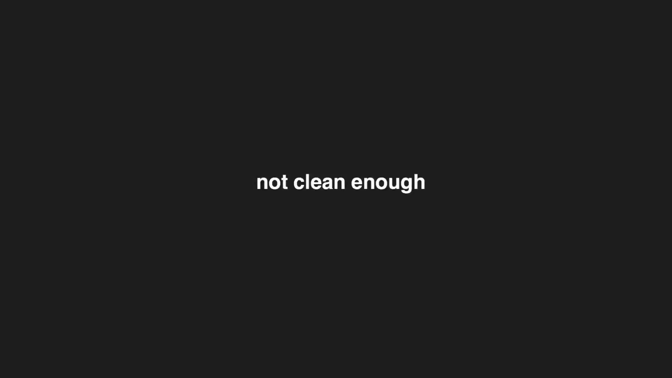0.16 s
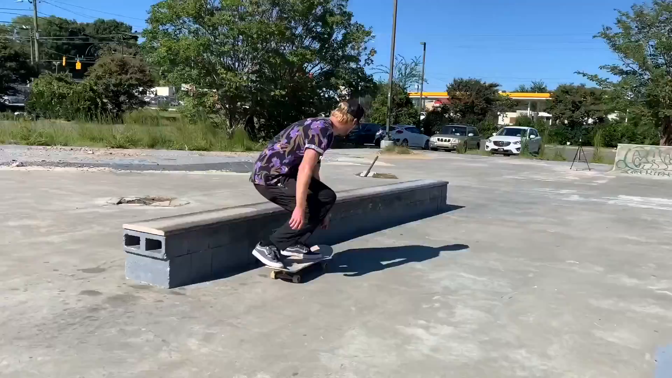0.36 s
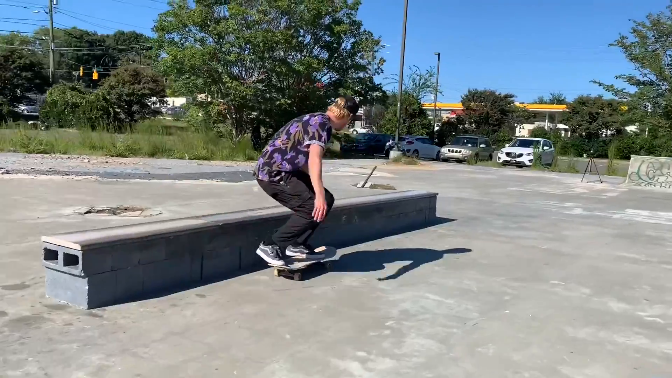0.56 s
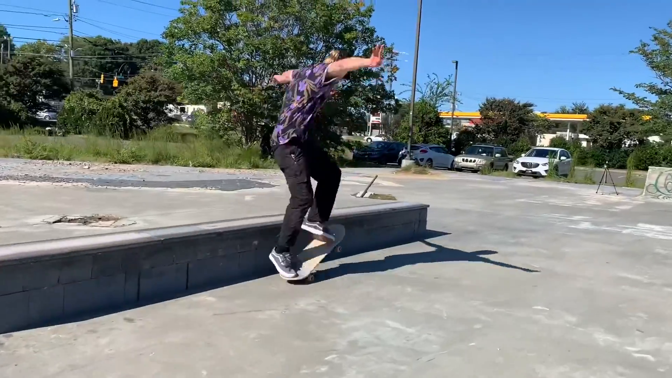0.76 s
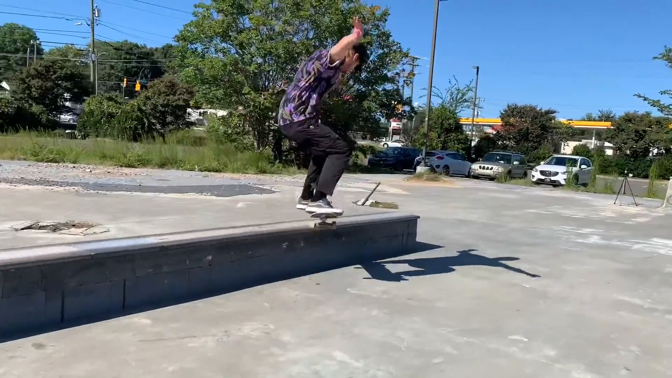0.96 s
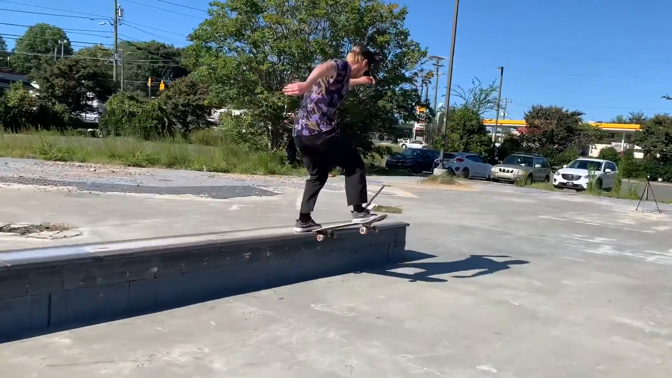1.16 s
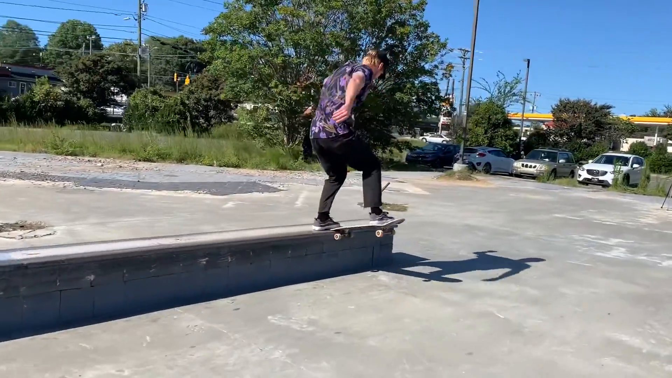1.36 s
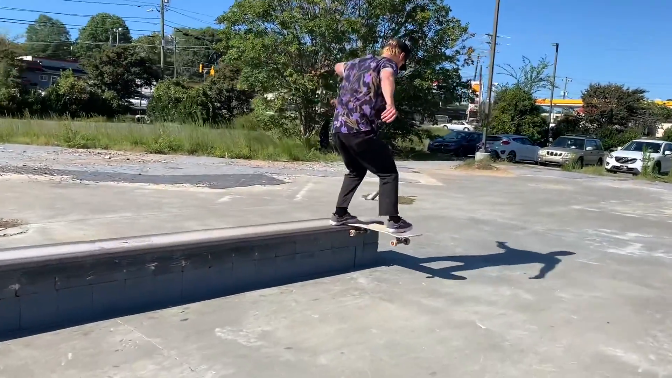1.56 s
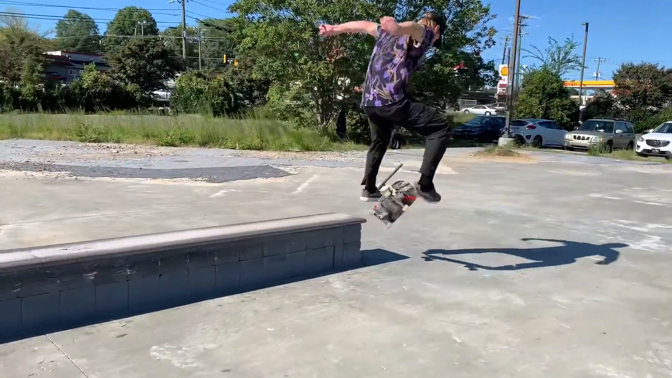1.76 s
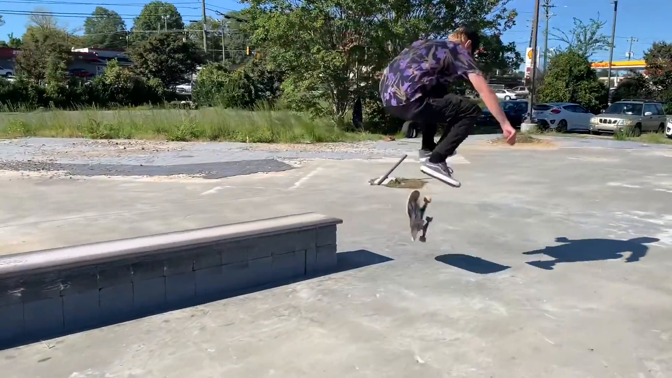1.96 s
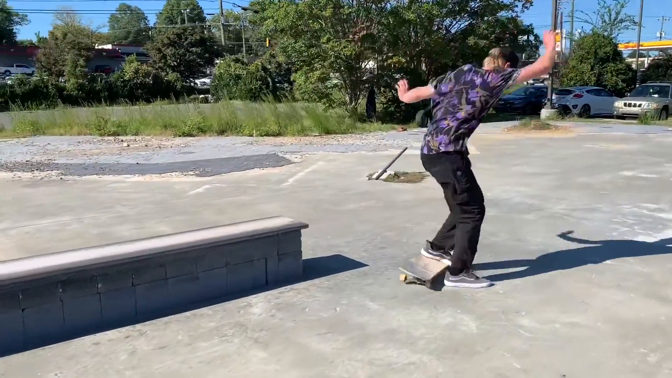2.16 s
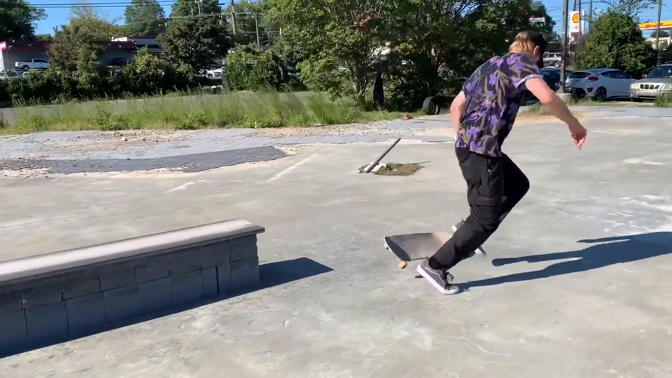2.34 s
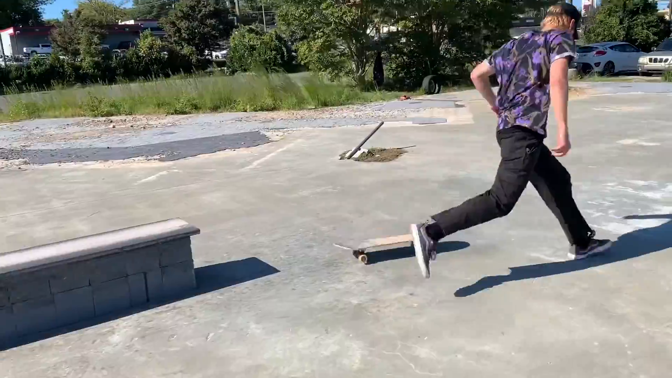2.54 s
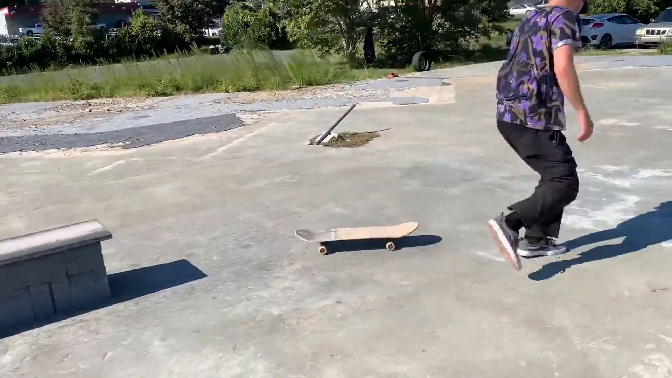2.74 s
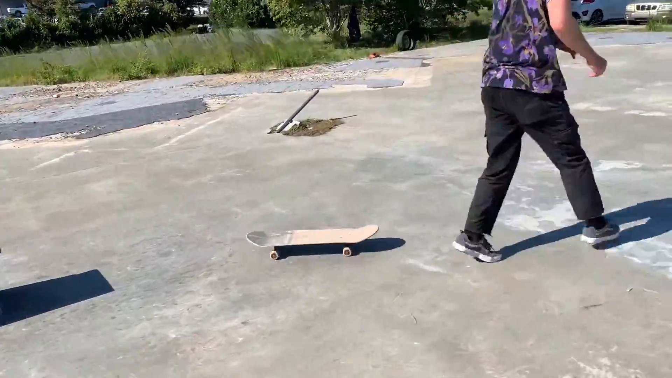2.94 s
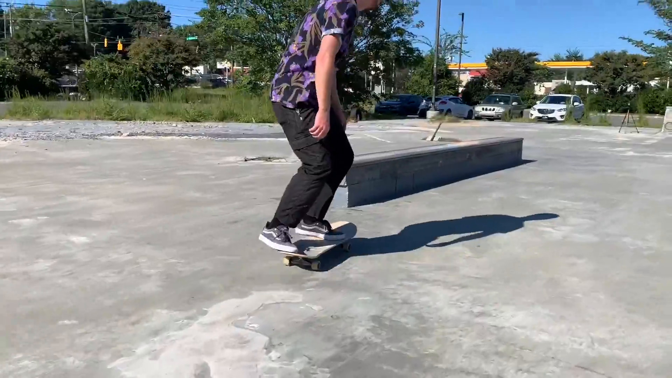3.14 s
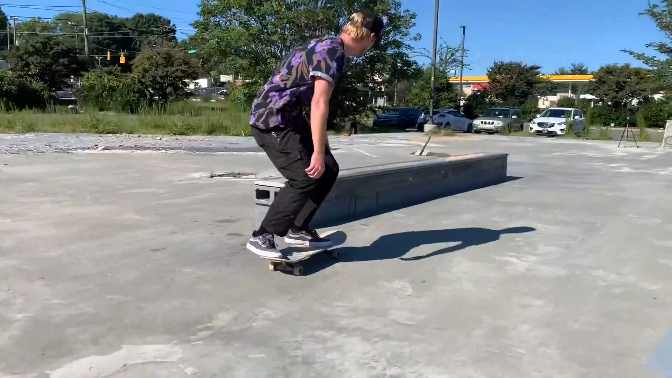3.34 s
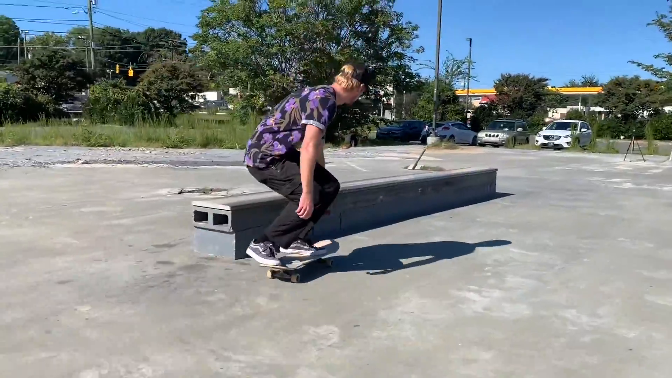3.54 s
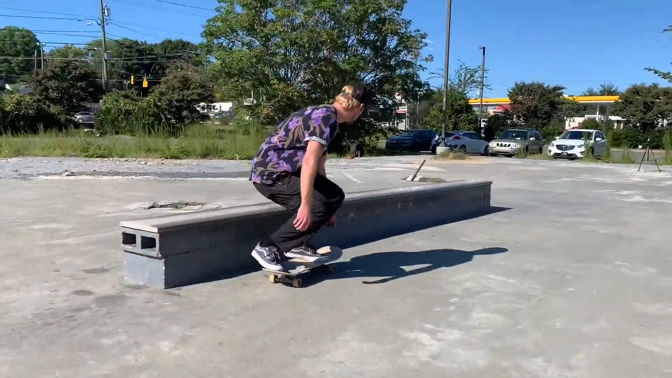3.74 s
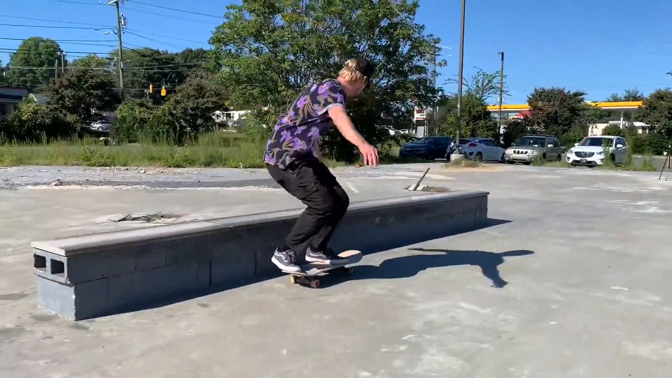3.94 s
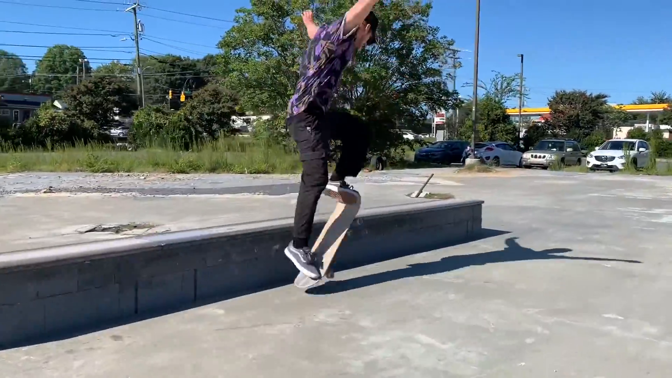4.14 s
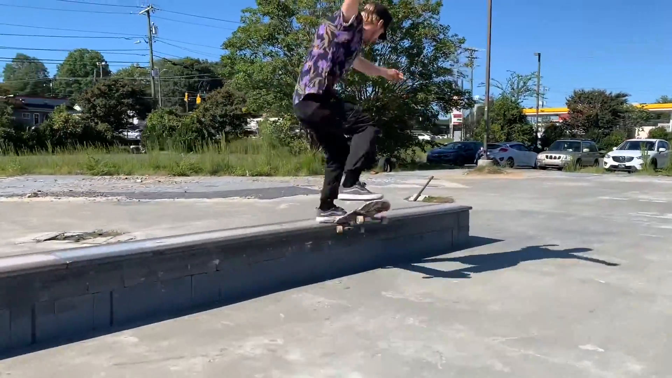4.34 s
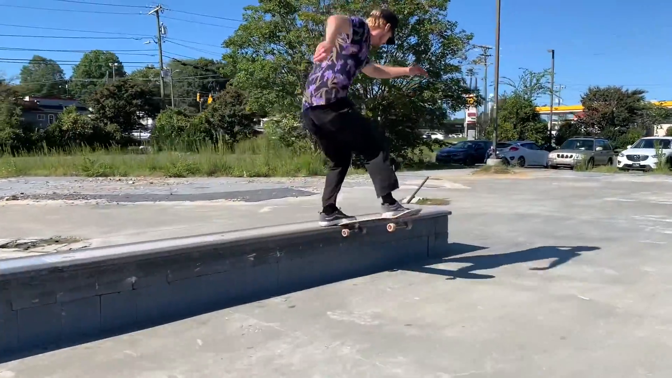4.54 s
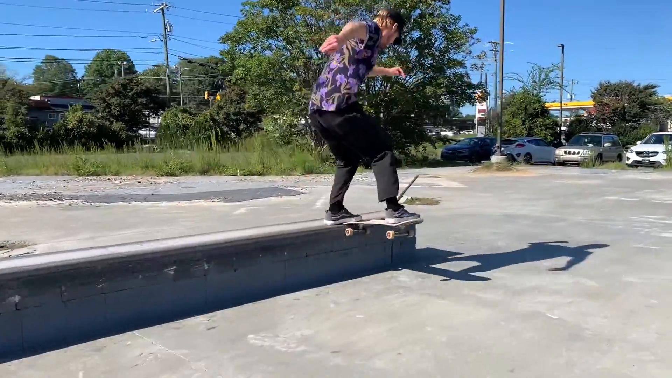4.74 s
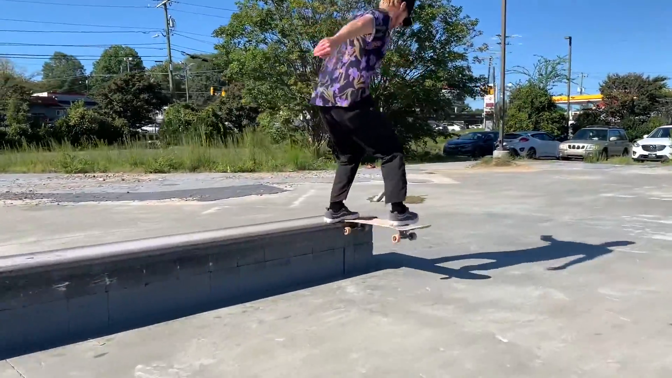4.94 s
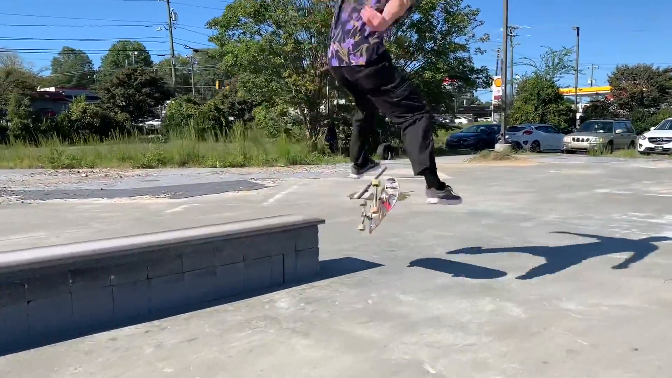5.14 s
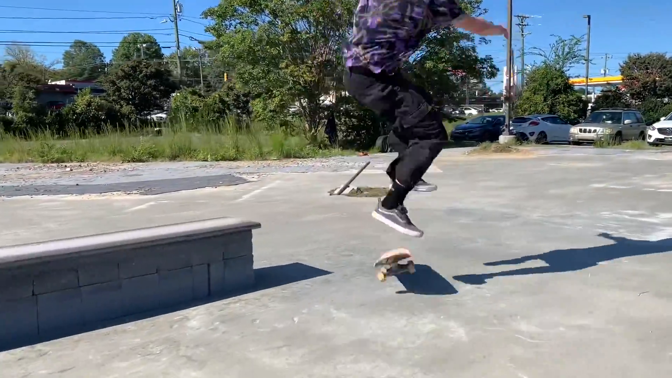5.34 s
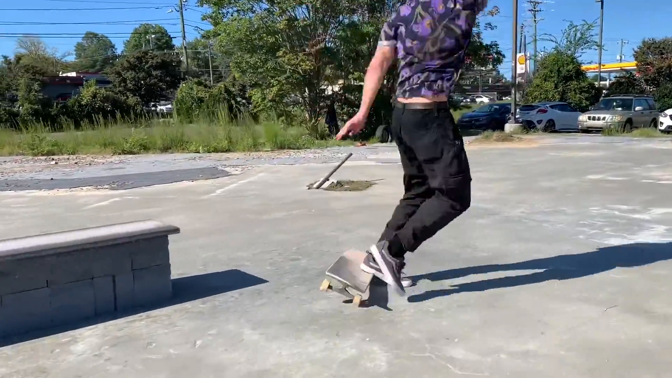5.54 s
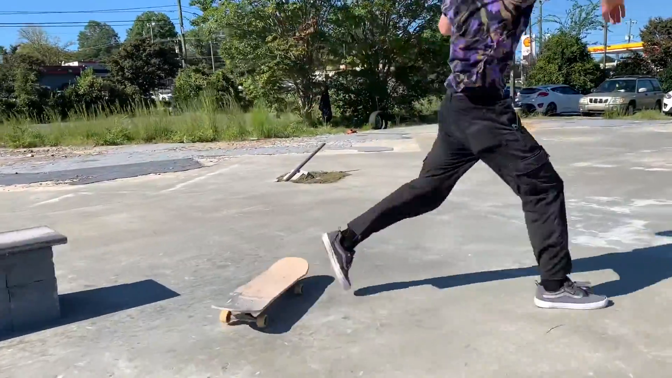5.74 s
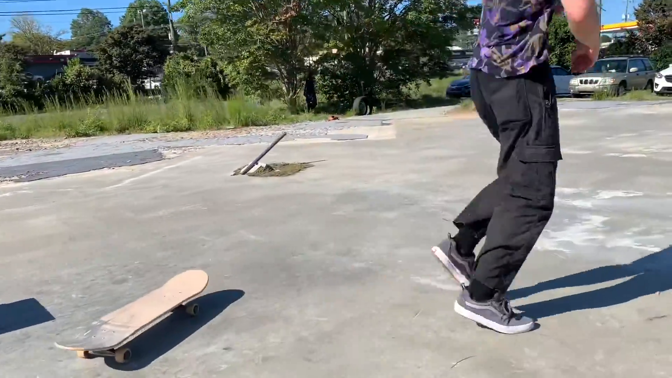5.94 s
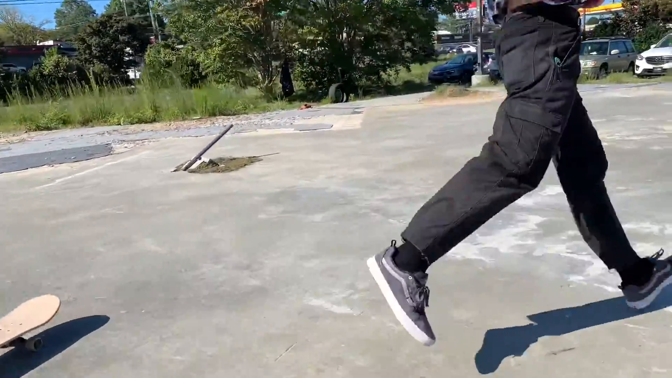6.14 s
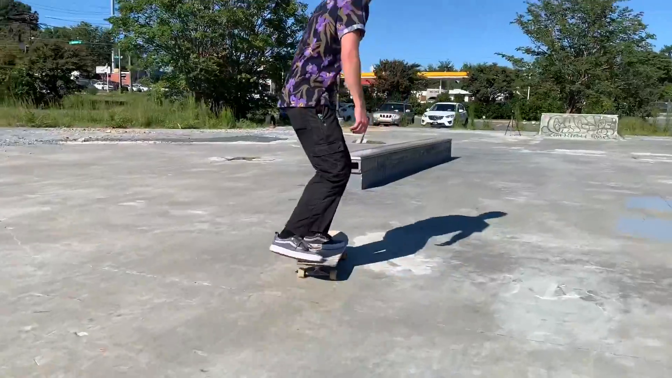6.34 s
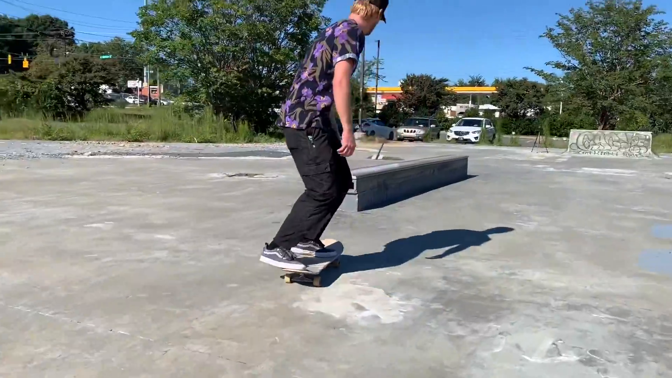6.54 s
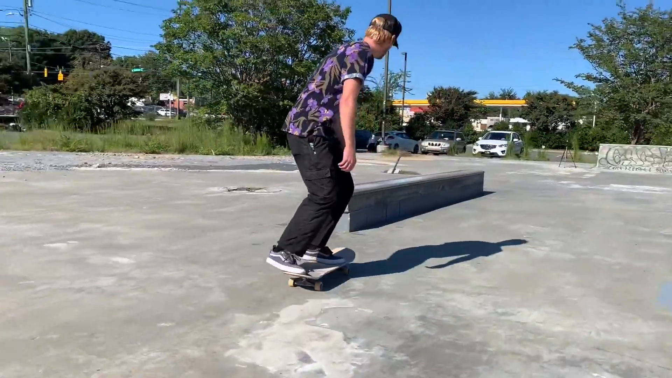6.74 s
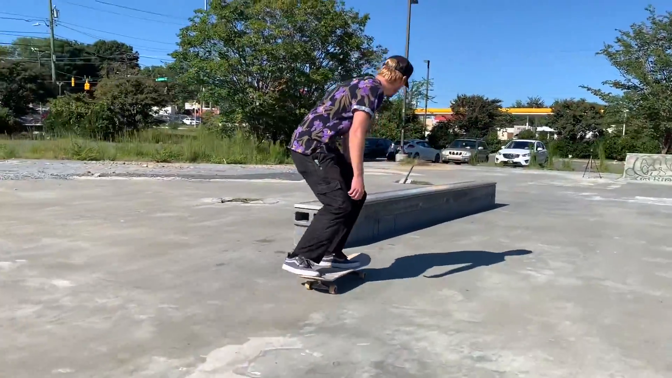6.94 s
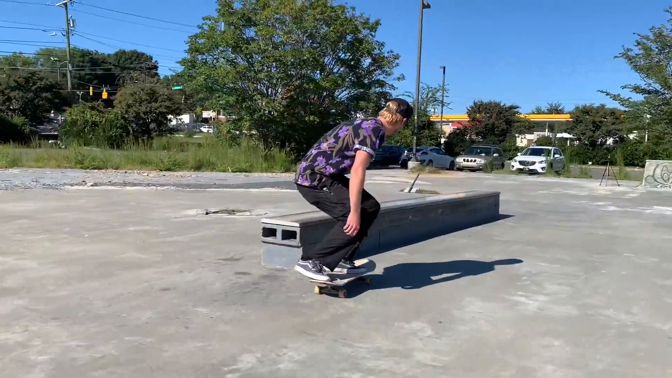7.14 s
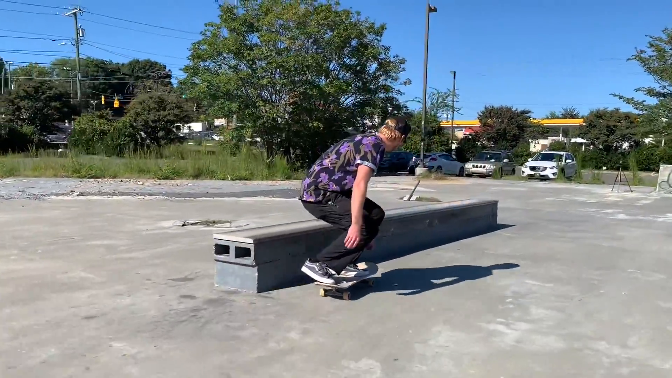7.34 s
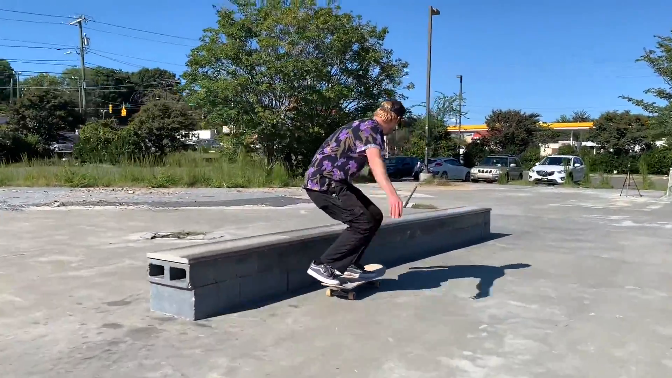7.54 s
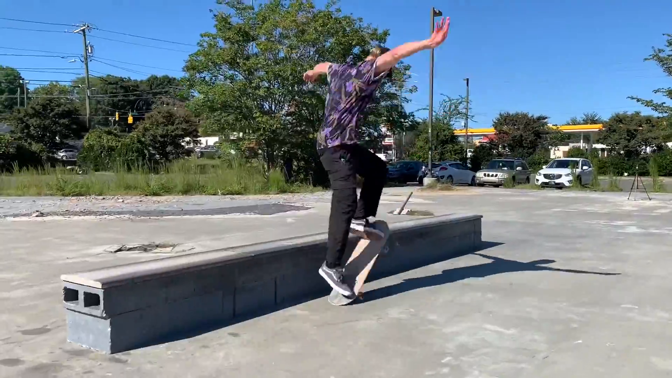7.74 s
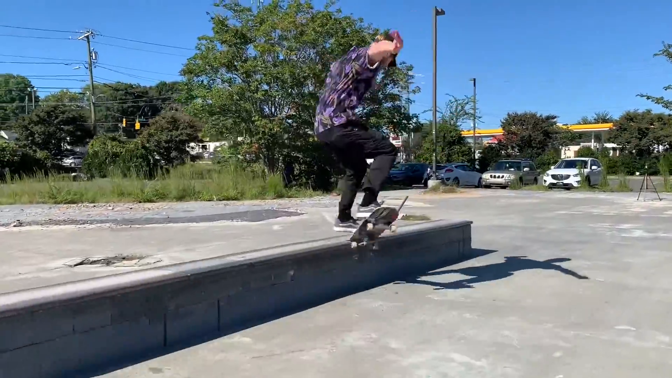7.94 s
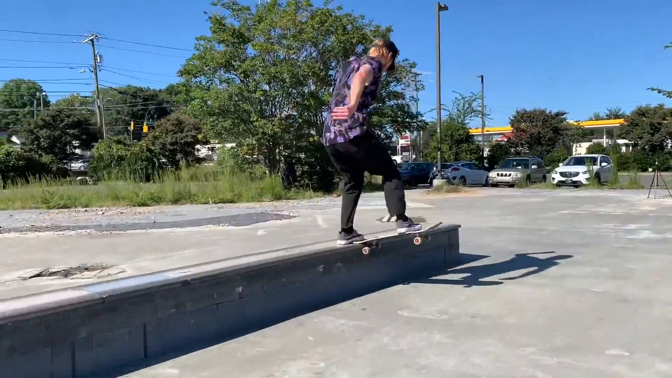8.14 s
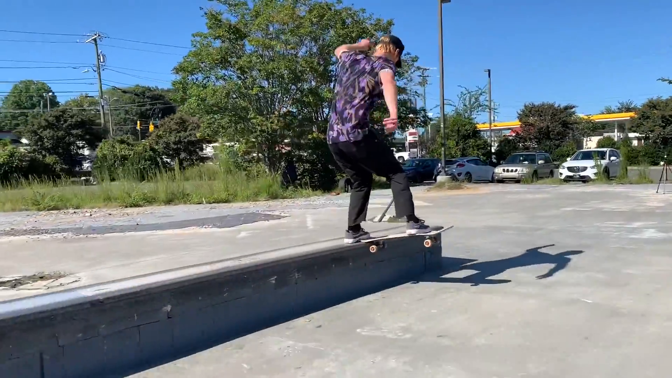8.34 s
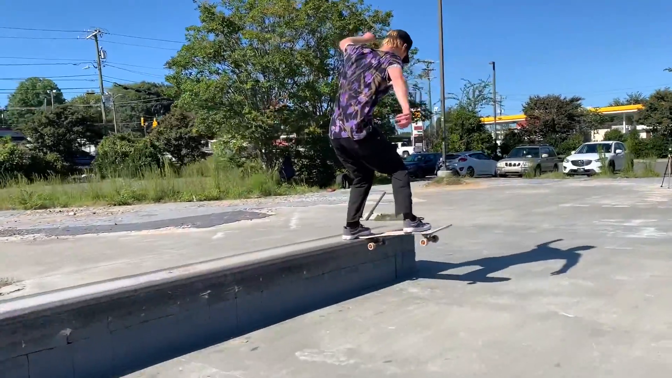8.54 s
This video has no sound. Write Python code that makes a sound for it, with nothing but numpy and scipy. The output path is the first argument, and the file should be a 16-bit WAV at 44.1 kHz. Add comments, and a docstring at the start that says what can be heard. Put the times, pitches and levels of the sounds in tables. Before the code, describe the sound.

Three abruptly joined skateboard attempts outdoors: gritty rolling, a hard pop and landing on a ledge, squeaky sliding, then clattering board knocks.

```python
"""A skateboard clacks and knocks on concrete and a steel ledge edge, in three tries played one after another.
Blows are noise bursts ringing steel and deck; knocks are short sagging deck notes; squeaks are wavering tones.
Scrapes are coloured grains, and narrow noise swells briefly into some blows. Under them wheels roll over
rough concrete, made of random bumps; this drops away after some blows and fades at the cuts between tries."""
import sys
import numpy as np
from scipy import signal
from scipy.fft import rfft, irfft
from scipy.io import wavfile
from scipy.ndimage import uniform_filter1d

SR = 44100
rng = np.random.default_rng(int(sys.argv[2]) if len(sys.argv) > 2 else 0)


def dump_mix(stems):
    """Bounce the given channels to the path in sys.argv[1] as a 16-bit WAV at rate SR."""
    frames = np.atleast_2d(stems).T  # one column per channel
    limited = np.clip(frames, -1, 1)  # hard clip at full scale
    pcm = np.round(limited * 32767).astype(np.int16)
    wavfile.write(sys.argv[1], SR, pcm)


N = 378819

# notes of the wooden deck: f/Hz, width/Hz, level/dB
DECK_RINGS = [(394, 152.5, -4), (484, 96.4, 2.5), (536.8, 64, 1), (636.5, 53.5, -2.5), (790.6, 52, -7.5),
              (1140, 153, -16)]
# rings of the axles and the ledge edge: f/Hz, width/Hz, level/dB
STEEL_RINGS = [(1070, 200, 3.5), (1376, 53, 7.5), (1813, 300, 3.5), (2354, 206, 4), (2824, 210, 1),
               (3375, 260, 1), (3890, 350, -2), (4786, 210, 2.5)]
# joins between the tries: t/s, rolling fades out over/s, fades back in over/s
TRY_CUTS = [(2.995, 1, 0.039), (6.195, 0.041, 0.033)]


def undb(db):
    """Turn dB into a gain."""
    return 10 ** (np.asarray(db) / 20)


def unit(x):
    """Scale to an rms of 1."""
    return x / np.sqrt(np.mean(x ** 2))


def along_hz(points, size):
    """Read a (f/Hz, value) table at every bin of a transform, evenly in log frequency."""
    hz, value = np.transpose(points)
    return np.interp(np.log(np.fft.rfftfreq(size, 1 / SR) + 1), np.log(hz + 1), value)


def colour(x, points):
    """Filter by a (f/Hz, level/dB) table."""
    size = x.shape[-1]
    return irfft(rfft(x) * undb(along_hz(points, size)), size)


def ring(x, hz, width_hz):
    """Make one resonance ring, with a gain of 1 at its centre."""
    b, a = signal.iirpeak(min(hz, .45 * SR), hz / width_hz, SR)
    return signal.lfilter(b, a, x)


def body(x, modes):
    """Make several resonances ring side by side, with alternating signs."""
    return sum((-1) ** k * undb(db) * ring(x, hz, width) for k, (hz, width, db) in enumerate(modes))


def struck(modes):
    """Shift and weight the same rings at random, as the place of a blow would."""
    chance = rng.standard_normal((len(modes), 2))
    return [(hz * (1 + .03 * a), width, db + 2 * b) for (hz, width, db), (a, b) in zip(modes, chance)]


def walk(rate):
    """Wander at random: levels held for 1 / rate seconds, smoothed twice, rms 1."""
    k = int(SR / rate)
    steps = np.repeat(rng.standard_normal(N // k + 1), k)
    smooth = uniform_filter1d(uniform_filter1d(steps, k), k)
    return unit(smooth[:N])


def stones(rate, spread_db):
    """Make random bumps like grains in concrete, rate per second, a few of them much larger."""
    hit = rng.random(N) < rate / SR
    return unit(hit * rng.standard_normal(N) * undb(spread_db * rng.exponential(size=N)))


def blow(t, rise_s, tail_db, tail_t60):
    """Shape a contact force that swells and eases off, peak near 1, with a faint tail."""
    push = t / rise_s * np.exp(.5 - .5 * (t / rise_s) ** 2)
    tail = undb(tail_db - 60 * t / tail_t60) * np.tanh(t / rise_s)
    return push + tail


def add(out, s, sound):
    """Mix a sound in at s seconds."""
    i = int(s * SR)
    out[i:i + len(sound)] += sound[:N - i]


def roll_levels():
    """Give drone, rumble, grit and hiss levels in dB: a curve for each try, drops after blows, fades at cuts."""
    # rolling, one list for each try: t/s, deck drone/dB, rumble/dB, treble/dB
    roll_curves = [
        [(0, -29.5, -25, -39), (.3, -24, -20.5, -39), (1.0, -24, -22, -39), (1.35, -29, -19.5, -42),
         (1.7, -26, -32.5, -47), (2.15, -28.5, -22, -46.5), (2.6, -25, -32.5, -43.5)],
        [(3.0, -19, -19.5, -36), (3.37, -19.5, -22.5, -36.5), (3.41, -27.5, -26.5, -43.5),
         (3.75, -22.5, -27, -39), (4.35, -24.5, -22, -40), (4.85, -25.5, -27, -45.5), (5.25, -24, -24, -45.5),
         (5.65, -27, -22.5, -45), (6.15, -26.5, -25, -47)],
        [(6.2, -22.5, -32.5, -37.5), (6.9, -23.5, -23, -37.5), (7.2, -22, -27.5, -40.5),
         (7.9, -24, -25.5, -37.5), (8.38, -25, -22, -45.5), (8.59, -26, -21, -33.5)],
    ]
    # dips of the rolling after a blow: t/s, depth/dB, stays down/s, climbs back over/s
    dips = [(1.045, -14, 0.016, 0.19), (2.185, -7.5, 0.04, 0.2), (4.374, -21, 0.066, 0.23),
            (7.225, -6, 0.033, 0.29), (7.99, -14.5, 0.091, 0.16)]
    t = np.arange(N) / SR
    which = np.searchsorted(np.array(TRY_CUTS)[:, 0], t)

    def follow(column):
        """Read one column of the curves, each try in its own time."""
        tries = [np.array(curve) for curve in roll_curves]
        return np.choose(which, [np.interp(t, c[:, 0], c[:, column]) for c in tries])

    drop, fade = np.zeros(N), np.zeros(N)
    for s, db, stay, climb in dips:
        drop += np.interp(t - s, np.cumsum([0, 0.017, stay, climb]), [0, db, db, 0])  # falls in 0.017 s
    for s, fade_out, fade_in in TRY_CUTS:
        fade += 20 * np.log10(np.interp(t - s, [-fade_out, 0, fade_in], [1, .02, 1]))
    drone = follow(1) + drop
    rumble = follow(2) + 0.92 * drop
    hiss = follow(3) + 0.43 * drop
    # grit lies between drone and hiss, with an offset in dB for each try
    grit = drone + 0.44 * (hiss - drone) + np.array([-11, -10, -6.5])[which]
    return drone + fade, rumble + fade, grit + fade, hiss + fade


def rolling(drone_db, rumble_db, grit_db, hiss_db):
    """Shake deck, wheels and bearings with random bumps; drone, grit and hiss swell together on rough patches."""
    # colours of the rumble, the grit and the hiss: f/Hz, level/dB
    rumble_colour = [(25, -31), (43, -5), (65, -1), (184, -6.5), (270, -10), (400, -16.5), (520, -37),
                     (880, -120)]
    grit_colour = [(530, -44), (900, -1.5), (1280, 0), (1660, -2.5), (2580, -16.5), (3050, -7), (3900, -38),
                   (5500, -42), (7150, -41), (12100, -120)]
    hiss_colour = [(3500, 5.5), (5000, -3), (9500, -4.5), (12500, -16.5), (16300, -11)]
    patch = walk(30)
    gusts_db = 2.2 * walk(14)  # the rumble swells on its own
    rumble = unit(colour(stones(2500, 1.36), rumble_colour)) * undb(rumble_db + gusts_db)
    drone = unit(body(stones(1500, 1.2), DECK_RINGS)) * undb(drone_db + 2.0 * patch)
    grains = colour(stones(1500, 0.98), grit_colour)
    ringing_grains = unit(grains + 0.32 * body(grains, STEEL_RINGS))
    grit = ringing_grains * undb(grit_db + 2.5 * patch + 2.95 * walk(40))
    hiss = unit(colour(stones(9800, 0.45), hiss_colour))
    hiss = hiss * undb(hiss_db + 0.84 * patch + 2.0 * walk(30))
    return rumble + drone + grit + hiss


def scrapes():
    """Drag wood and rubber over grit: dense grains in bursts, where each catch sets off one ring of the steel."""
    # deck sliding on the ledge, shoes scuffing: t/s, length/s, level/dB, level change/dB
    drags = [(1.12, 0.095, -48, 4), (1.2, 0.429, -34, -5), (1.676, 0.15, -30, -17.5),
             (2.127, 0.07, -24.5, -5), (4.541, 0.41, -38, -6.5), (5.007, 0.14, -36, -8),
             (5.364, 0.153, -35, 0), (5.658, 0.27, -42, 5.5), (8.185, 0.36, -45, 0.5)]
    # colour of the grains: f/Hz, level/dB
    drag_colour = [(900, 1), (1600, 7.5), (2600, -2), (4200, -6), (5800, -11), (9000, 0), (12500, -11),
                   (16300, -4)]
    catches = unit(sum(body(stones(350, 1.1), [mode]) for mode in STEEL_RINGS))
    grains = unit(colour(stones(9000, 1.2), drag_colour))
    grit = unit(grains + catches) * undb(2.9 * walk(60) + 1.7 * walk(200))
    gain = np.zeros(N)
    for s, length, db, change_db in drags:
        i = np.arange(int(s * SR), min(int((s + length) * SR), N))
        edges = signal.windows.tukey(len(i), min(0.044 * SR / len(i), 1))
        gain[i] += undb(db + change_db * (i / SR - s) / length) * edges
    return gain * grit


def swells():
    """Narrow noise that swells briefly into a blow."""
    # noise before a blow: ends at t/s, level at the end/dB, centre f/Hz
    lead_ins = [(1.036, -21, 3040), (2.102, -25, 4000), (4.37, -8.5, 2780), (7.779, -20, 2800),
                (7.986, -16, 2700)]
    out, t = np.zeros(N), np.arange(int(SR / 10)) / SR
    rise = np.exp(-(t[::-1] / 0.0068) ** 2)  # nearly all in the last 0.01 s
    for s, db, hz in lead_ins:
        noise = rng.standard_normal(len(t))
        narrow = unit(ring(ring(noise, hz, 1200), hz, 1200))
        add(out, s - len(t) / SR, undb(db) * narrow * rise)
    return out


def squeaks():
    """Rubber sticks and slips on the edge at a wavering rate: a rough tone whose two overtones come and go."""
    # t/s, length/s, first slip rate/Hz, last/Hz, level/dB, level change/dB, 2nd multiple/dB, 3rd multiple/dB
    slips = [(1.132, 0.022, 2600, 2350, -38, -2, -46, -52), (1.156, 0.034, 2330, 2230, -41, 2, -44, -51),
             (1.236, 0.012, 2680, 2550, -30, -1, -50, -65), (1.24, 0.068, 2150, 2150, -39, -5, -39, -58),
             (1.3, 0.038, 2480, 2580, -31.5, -5, -50, -60), (1.342, 0.037, 2600, 2500, -26, 0, -46, -43),
             (4.461, 0.064, 2390, 2100, -49, 2, -59, -68), (4.59, 0.03, 2300, 2000, -40, 0, -54, -56),
             (4.624, 0.048, 1960, 2170, -33.5, 2, -55, -50), (4.676, .03, 2300, 2200, -52, 2, -46, -51),
             (4.698, 0.0174, 2070, 2560, -32, -6, -60, -62), (8.126, 0.034, 2310, 2270, -39, -2, -41, -57),
             (8.184, 0.038, 2330, 2300, -31.5, -4, -32, -54), (8.216, 0.11, 2350, 2473, -36.5, 6, -49, -60),
             (8.308, 0.043, 2507, 2380, -38, 5, -54, -52)]
    settle_s = 0.049  # pace at which the slip rate closes in on its last value
    out, waver, flutter = np.zeros(N), walk(900), walk(170)
    broken = walk(250), walk(250)
    for s, length, first_hz, last_hz, db, change_db, *overs_db in slips:
        i = np.arange(int(s * SR), int((s + length) * SR))
        t = i / SR - s
        settled = (1 - np.exp(-t / settle_s)) / (1 - np.exp(-length / settle_s))
        rate_hz = first_hz + (last_hz - first_hz) * settled
        rate_hz = rate_hz * (1 + 0.016 * waver[i] + .006 * flutter[i])
        phase = 2 * np.pi * np.cumsum(rate_hz) / SR
        tone = undb(db + change_db * t / length) * np.sin(phase)
        for multiple, over_db, breaks in zip((2, 3), overs_db, broken):
            tone += undb(over_db + 5 * np.minimum(breaks[i], 1)) * np.sin(multiple * phase)
        edges = signal.windows.tukey(len(i), min(0.0067 * SR / len(i), 1))
        stutter = undb(3.8 * np.minimum(flutter[i] + .6 * waver[i], 1))
        out[i] += np.sqrt(2) * stutter * edges * tone
    return out


def knocks():
    """A soft wheel pushes for a few ms, so the deck's note jumps up, holds some cycles and stops."""
    # wheels dropping into seams, deck slapping down: t/s, level/dB, pitch f/Hz
    thumps = [(0.15, -12.5, 548), (0.944, -9.5, 576), (2.154, -9.5, 390), (2.163, -12, 477),
              (2.168, -7, 296), (2.314, -14, 572), (2.398, -18.5, 513), (3.038, -11.5, 500),
              (3.059, -5.5, 424), (3.185, -5.5, 580), (3.241, -7, 498), (3.293, -12, 497),
              (3.364, 1.5, 458), (3.497, -9, 570), (3.988, -12.5, 637), (5.217, -2.5, 467),
              (5.361, -5, 607), (5.454, -8, 460), (6.887, -10.5, 610), (7.216, -2.5, 410),
              (7.363, -4.5, 510), (7.377, -7.5, 480), (7.775, -12.5, 403), (7.945, -16, 305)]
    out, t = np.zeros(N), np.arange(int(SR / 5)) / SR
    hold = np.exp(-(t / 0.0066) ** 3)
    tail = undb(-14 - 60 * t / 0.07)
    shape = np.tanh(t / 0.0009) * (hold + tail)
    for s, db, hz in thumps:
        turns = 2 * np.pi * hz * (t + 0.00041 * (1 - np.exp(-t / 0.00082)))  # starts sharp, then sags
        note = np.sin(turns) + 0.25 * np.sin(1.636 * turns)
        rattle = unit(body(rng.standard_normal(len(t)), DECK_RINGS))
        add(out, s, undb(db) * shape * (note + 0.5 * rattle))
    return out


def clacks():
    """A short hard burst of noise rings the steel, the deck and the place struck; a bright crack rides on top."""
    # tail, axles and shoes hitting concrete or steel: t/s, level/dB, centre f/Hz, crack against the rest/dB
    hits = [(0.165, -17, 1200, -22), (0.831, 0, 2150, -10.5), (1.034, -1.5, 2990, -19),
            (1.063, -5, 3830, -33), (1.12, -16.5, 2940, -18), (1.603, -18, 4020, -2),
            (1.666, -25.5, 3800, -7), (1.694, -24, 4000, -15), (1.72, -19, 3570, -12),
            (1.753, -23.5, 3200, -24), (1.777, -24, 3740, -22), (2.103, -1, 4300, -10),
            (2.1078, -9.5, 1500, -12), (2.1392, -13, 3770, -14), (2.155, -7, 1530, -10),
            (2.163, -5, 1630, -2.5), (2.575, -18.5, 1690, 0.5), (2.6984, -35.5, 3400, 7.5),
            (2.7906, -26, 1540, 0.5), (3.186, -16.5, 1350, -7), (3.294, -14.5, 1520, -7),
            (3.852, -23, 1280, -14), (4.143, -1, 2550, -10.5), (4.147, -12, 1270, -29),
            (4.369, -5.5, 2830, -6), (4.39, -17.5, 1900, -5), (4.537, -27, 2740, -13),
            (4.6433, -26.5, 2080, 2), (4.7251, -31, 1360, 10), (4.943, -33.5, 1300, 12.5),
            (5.0085, -30, 3600, -9), (5.026, -30, 4700, 6.5), (5.048, -22.5, 2050, -3),
            (5.089, -24, 2030, -20), (5.397, -2, 1500, -10), (5.412, -9.5, 1740, -7),
            (5.439, -18, 1810, -19), (5.453, -11, 2340, -0.5), (5.473, -11, 1570, -22),
            (5.4877, -5.5, 1380, -13), (5.507, -20, 1290, -21.5), (5.678, -29.5, 1500, 5.5),
            (5.718, -18, 1970, -3), (5.784, -16.5, 1380, -5), (5.8218, -22.5, 1610, 3),
            (6.889, -16.5, 3040, -9), (7.029, -20, 2880, -22), (7.216, -18, 2880, -22),
            (7.3643, -15.5, 2380, -31), (7.779, 2, 2740, -46), (7.9876, 2, 1810, -41),
            (8.0028, -16, 2900, -30), (8.025, -3, 3700, -40), (8.0694, -14.5, 2150, -14)]
    crack_colour = [(4500, -3.5), (6200, 1), (8000, 3), (10500, -0.5), (15000, -13.5)]  # f/Hz, level/dB
    out, t = np.zeros(N), np.arange(int(SR / 5)) / SR
    for s, db, hz, top_db in hits:
        push = rng.standard_normal((2, len(t)))
        burst = blow(t, 0.0023, -6, 0.055) * push[0]
        steel = 3 * body(ring(burst, hz, 1.1 * hz), struck(STEEL_RINGS))
        place = ring(burst, hz, 0.5 * hz)
        deck = 1.2 * body(burst, DECK_RINGS)
        tone = steel + place + deck
        crack = blow(t, 0.0012, -7, 0.072) * colour(push[1], crack_colour)
        sound = tone / np.abs(tone).max() + undb(top_db) * crack / np.abs(crack).max()
        add(out, s - .0015, undb(db) * sound)  # early start, so the force peaks near s
    return out


def ports(x, phase, shading):
    """Let each of two microphone openings hear the sound with its own phase and shading."""
    # left minus right at full shading: f/Hz, level/dB
    balance = [(300, 0.5), (700, 1), (1300, -1), (2400, -1), (4400, -4.5), (8000, -0.5)]
    half = np.exp(.5j * along_hz(phase, N)) * undb(shading * along_hz(balance, N) / 2)
    return irfft(rfft(x) * np.array([half, 1 / half]), N)


def scene():
    """Hear all sounds through both openings; rolling, scrapes, knocks and clacks also scatter from the sides."""
    # share arriving from the sides: f/Hz, level/dB
    side_share = [(40, -15.5), (250, -8.5), (1000, -11), (12000, -17)]
    # left minus right phase in the first two tries, then in the last: f/Hz, phase/rad
    early_phase = [(100, 0), (950, .6), (4400, 1.5), (8000, 1.3), (9560, 0), (11700, -3.1), (16000, -9.8)]
    late_phase = [(100, 0), (380, -1.5), (700, -2.2), (1300, -2.6), (3600, -2), (5600, -3.1), (8100, -5.1),
                  (16000, -12.8)]
    levels = roll_levels()
    near = rolling(*levels) + scrapes() + swells() + squeaks() + knocks() + clacks()
    # fresh random draws, opposite in sign left and right
    scattered = colour(rolling(*levels) + scrapes() + knocks() + clacks(), side_share)
    both = near + scattered * np.array([[1], [-1]])
    last_try = np.arange(N) > TRY_CUTS[1][0] * SR
    return np.where(last_try, ports(both, late_phase, 0), ports(both, early_phase, 1))


def record(dry):
    """Round off the loudest peaks and cut the top of the treble."""
    ceiling, top_hz = .93, 16250
    rounded = ceiling * np.tanh(dry / ceiling)
    return signal.sosfilt(signal.ellip(12, .2, 70, top_hz, fs=SR, output="sos"), rounded)


dry = scene()
out = record(dry)
dump_mix(out)
```